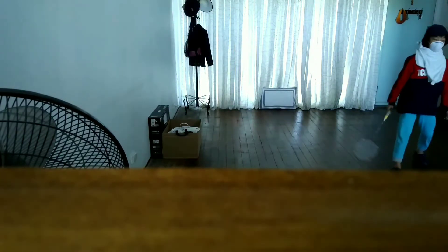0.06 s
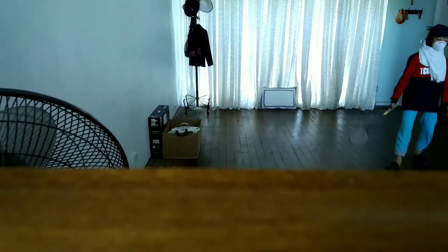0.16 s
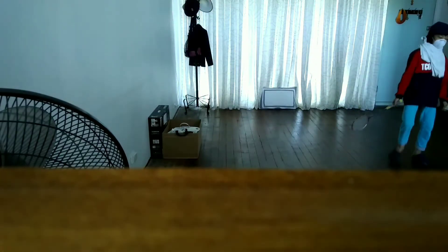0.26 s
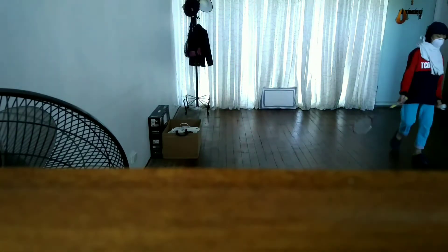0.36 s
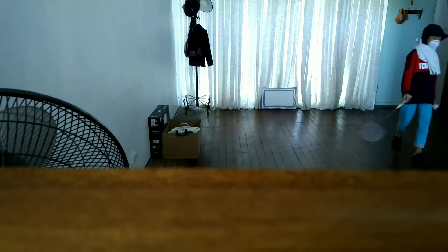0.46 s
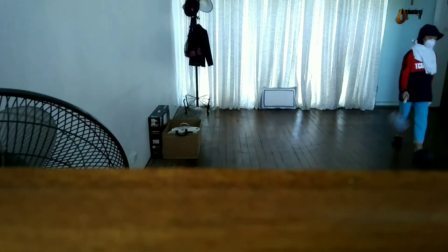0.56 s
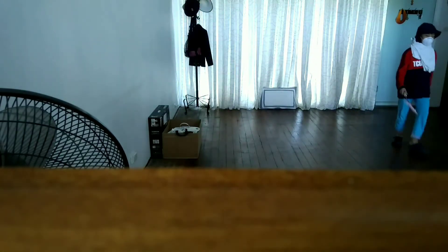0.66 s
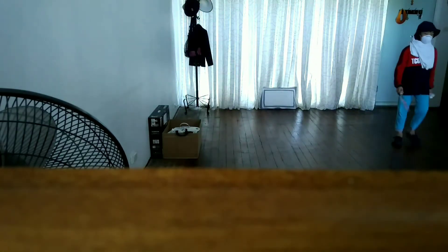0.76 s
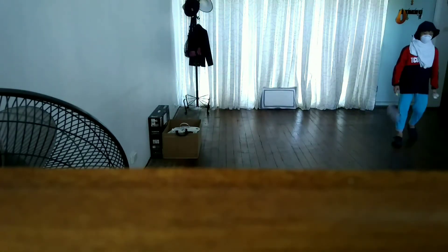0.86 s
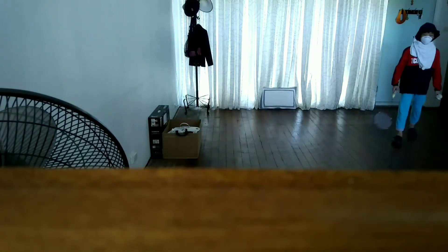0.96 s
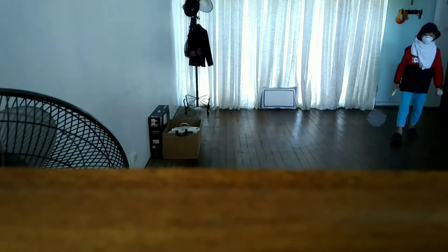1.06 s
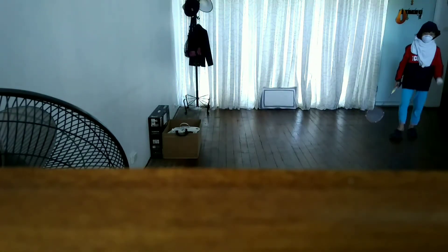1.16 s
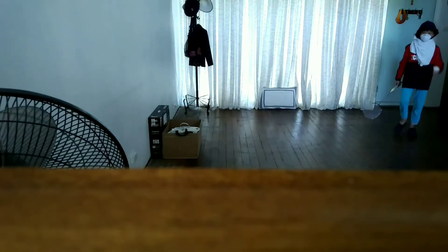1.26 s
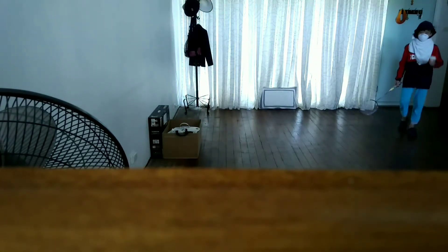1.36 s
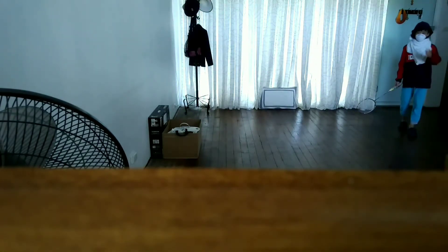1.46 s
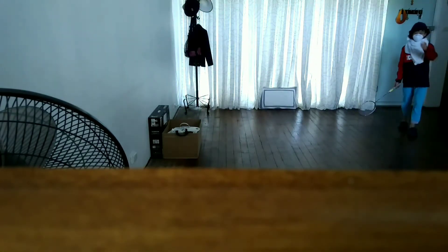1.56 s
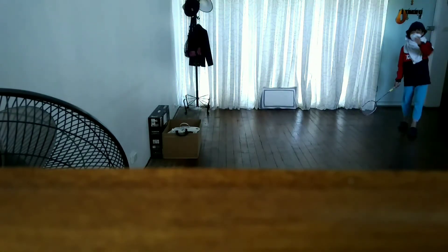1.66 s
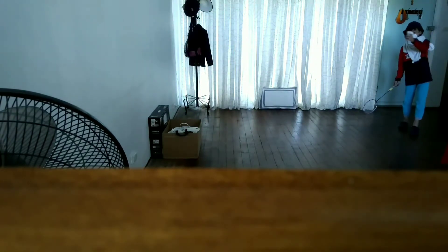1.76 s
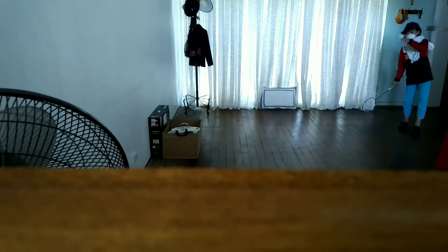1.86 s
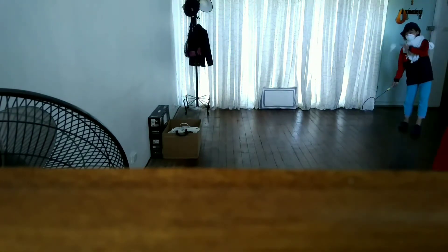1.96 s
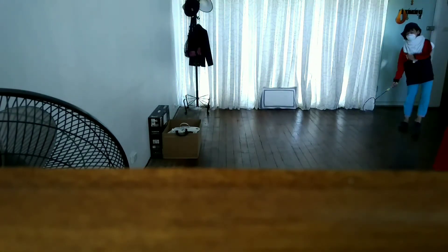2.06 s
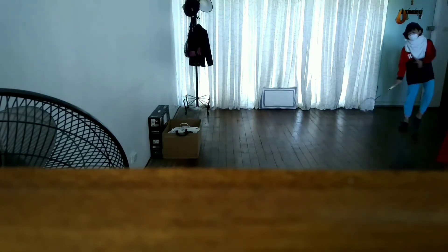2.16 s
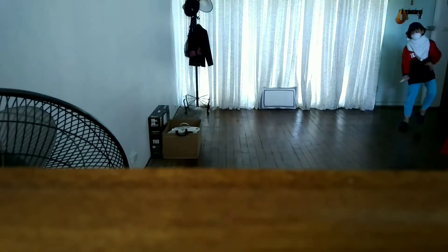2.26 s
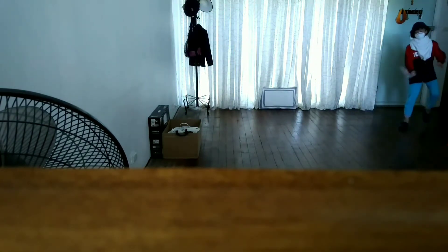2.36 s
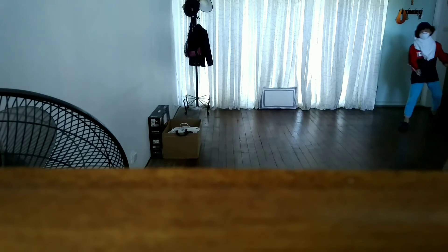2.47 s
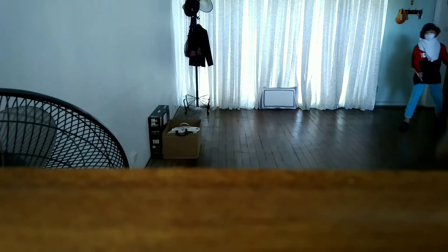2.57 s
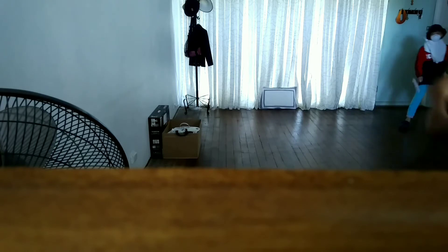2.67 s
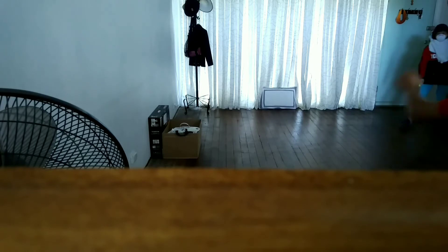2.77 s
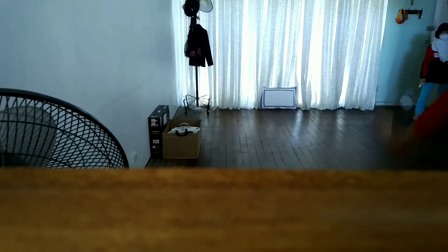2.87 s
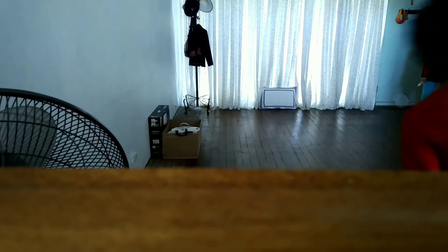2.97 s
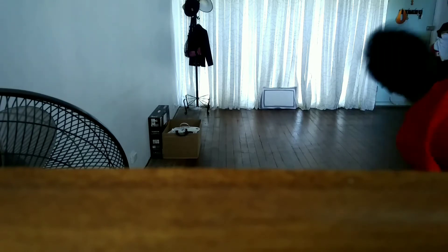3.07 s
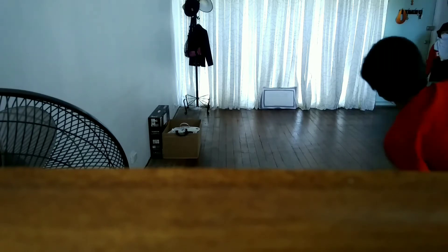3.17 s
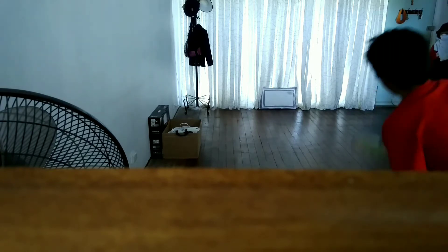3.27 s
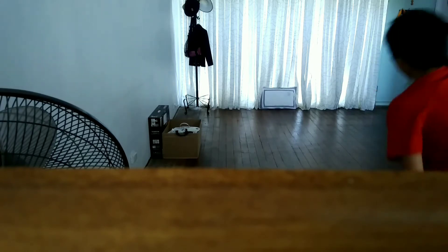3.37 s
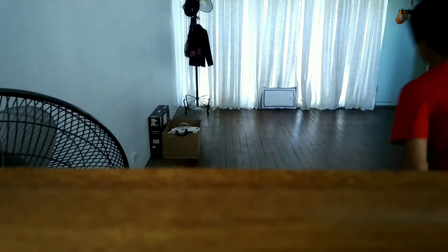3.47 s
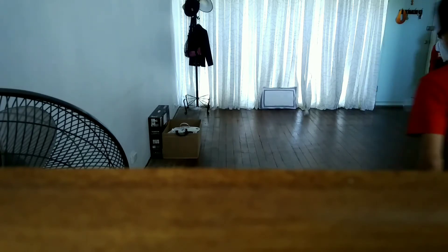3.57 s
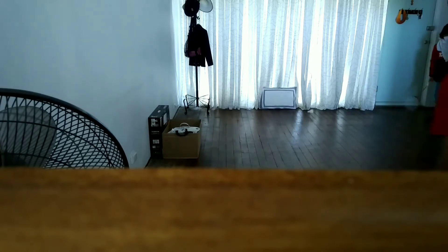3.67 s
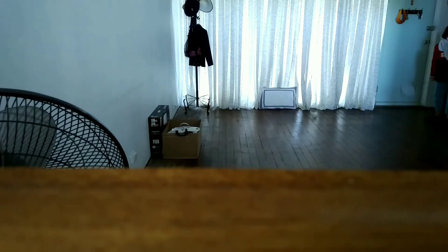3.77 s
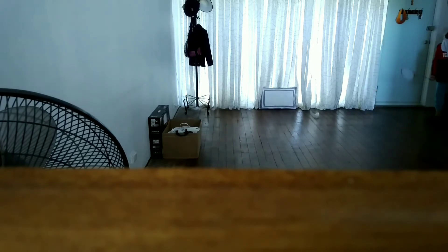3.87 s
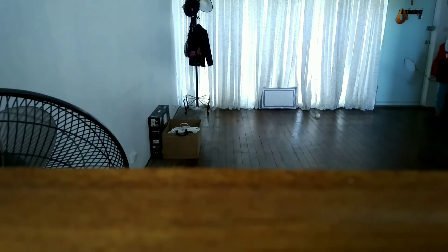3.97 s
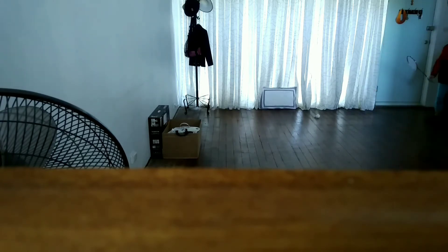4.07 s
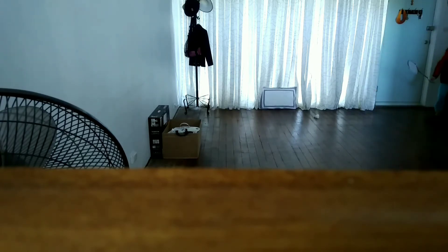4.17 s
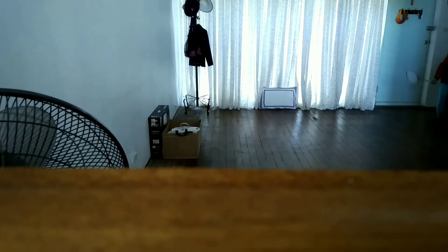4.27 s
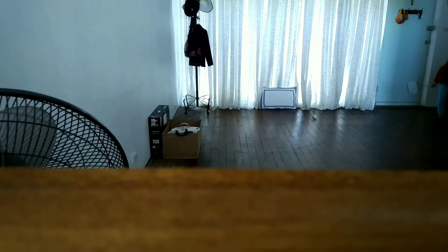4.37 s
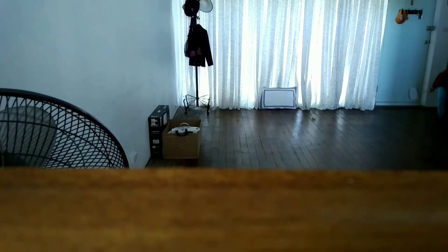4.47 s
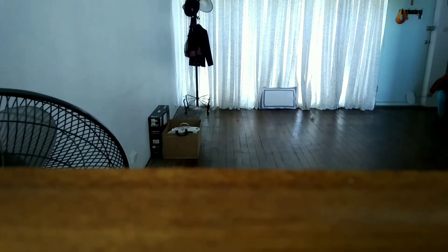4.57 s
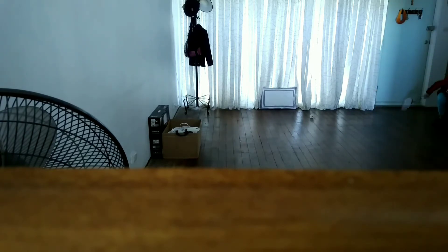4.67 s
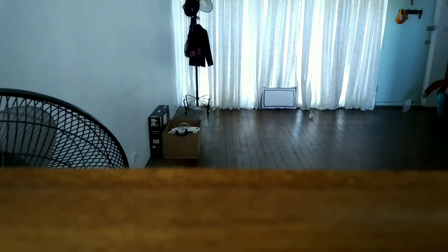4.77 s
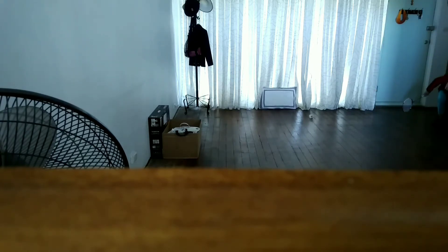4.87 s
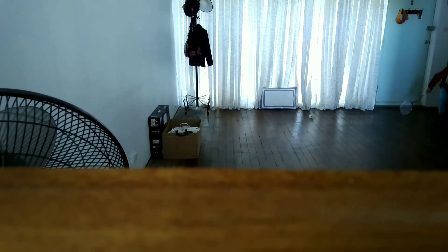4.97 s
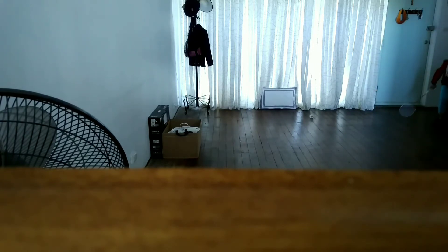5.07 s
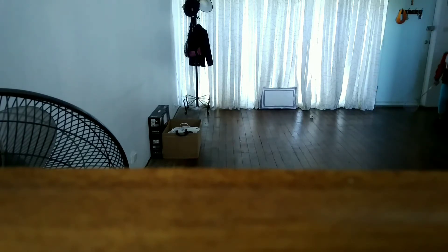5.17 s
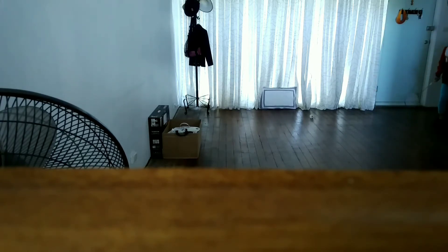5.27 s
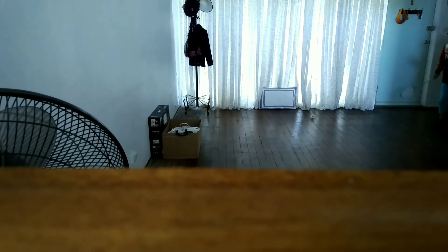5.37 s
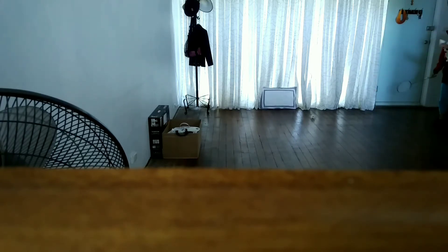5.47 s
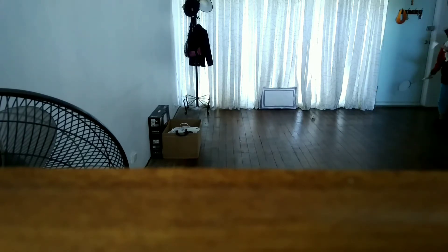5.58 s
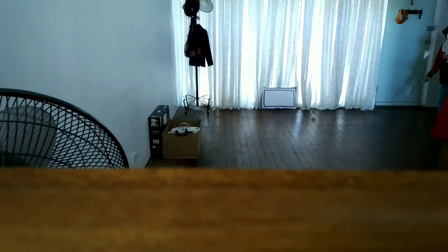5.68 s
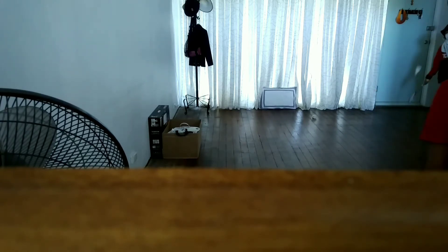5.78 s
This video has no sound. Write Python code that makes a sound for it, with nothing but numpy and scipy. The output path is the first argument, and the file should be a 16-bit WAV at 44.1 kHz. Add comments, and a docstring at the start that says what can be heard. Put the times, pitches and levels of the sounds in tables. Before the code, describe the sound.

Badminton practice in a bare, reverberant room with a wooden floor. Muffled steps, cloth rustle and sliding soles come first, with a small squeak and a faint swish. A light racket tap rings briefly, then a quick rising whoosh ends in one very loud sharp crack with a heavy footfall. Scattered knocks and faint scuffs follow. One fixed microphone hears the players at some distance, with the smash far louder than everything else.

```python
"""Badminton practice in a bare, echoing room with a wooden floor, over a faint broadband hush.
Steps thud and rumble on the boards amid rustling clothes, sliding soles, a squeak, a knock and a falling swish.
A light tap sets decaying string modes ringing; then gliding noise whistles up to one hard smash of filtered bursts.
A heavy footfall lands at once, knocks and scuffs follow, and near the end comes a faint whine.
A noise suppressor thins the faint tails and a limiter holds the loudest crack down."""
import sys
import numpy as np
from scipy import signal
from scipy.fft import rfft, irfft
from scipy.io import wavfile
from scipy.ndimage import uniform_filter1d

SR = 44100
rng = np.random.default_rng(int(sys.argv[2]) if len(sys.argv) > 2 else 0)


def dump_mix(stems):
    """Bounce the given channels to the path in sys.argv[1] as a 16-bit WAV at rate SR."""
    frames = np.atleast_2d(stems).T  # one column per channel
    limited = np.clip(frames, -1, 1)  # hard clip at full scale
    pcm = np.round(limited * 32767).astype(np.int16)
    wavfile.write(sys.argv[1], SR, pcm)


N = 257544
TIME = np.arange(N) / SR   # s

# The smash, cork on strings and then the shuttle striking home. Each row: time in seconds, level in dB.
SMASH_HITS = [(3.1109, -8.5), (3.15, -23)]
# Spectral shape of the crack. Each row: frequency in Hz, relative level in dB.
CRACK_SPECTRUM = [(40, -26), (90, -11.5), (150, 0.5), (300, 0.5), (610, 5), (820, -7), (1250, 4),
                  (1900, -5), (2700, -4.5), (4200, -5.5), (5200, -7.5), (8000, -9.5), (12000, -12.5),
                  (15500, -11.5)]
# Air whistling round the racket as it speeds up. Each row: time in seconds, pitch in Hz, level in dB.
SWING_GLIDE = [(3.054, 372, -55.5), (3.073, 476, -36.5), (3.081, 605, -27.5), (3.087, 725, -21.5),
               (3.094, 1205, -23), (3.104, 1450, -22), (3.108, 1387, -32), (3.113, 1200, -60)]

# A light tap on the shuttle, its spectral shape. Each row: frequency in Hz, relative level in dB.
TAP_SPECTRUM = [(60, -32), (150, 4), (300, 5), (480, 3), (750, -8), (1300, -3.5), (2500, -7.5), (4500, -13),
                (8000, -17.5), (15000, -21.5)]
TAP_S, TAP_DB = 2.286, -35
# Modes of the string bed. Each row: frequency in Hz, relative level in dB, 60 dB decay time in seconds.
STRING_MODES = [(1045.3, -43.5, 0.35), (1048, -34.5, 1.2), (1054, -45.5, 2.3), (1075.8, -27, 0.41),
                (1080, -33.5, 0.47), (1710, -45, 0.67), (1712, -44.5, .55), (2130, -35.5, 0.41),
                (2065, -42, 0.6), (2146, -40.5, 0.31), (2130, -34.5, .25), (2270, -45.5, 0.26),
                (2400, -50, .5), (2690, -50.5, .45), (2690, -50, 0.61), (3722, -41, 0.3),
                (3775, -44.5, 0.32), (5819, -56, 0.39)]

# Footfalls on the boards. Each row: heel time in seconds, heel thud in dB, sole slap in dB,
# floor rumble in dB, roll in dB (how much harder the ball lands than the heel).
STEPS = [(.005, -65, -63.5, -48, 0.5), (.165, -47, -71.5, -44.5, 2), (0.494, -58, -77, -45.5, -2),
         (.556, -40.5, -65, -41, 1), (.76, -51, -86, -54, -9), (1.029, -43.5, -70, -42.5, -11.5),
         (1.316, -52.5, -80, -58, 2.5), (1.474, -50, -82, -51.5, -3.5), (1.557, -56, -57.5, -54, -15),
         (2.358, -68, -85, -62.5, -1), (2.668, -60, -80, -54, -3), (2.777, -58, -78.5, -52, -1),
         (2.95, -49, -69, -46, 3.5), (3.266, -18, -32.5, -59, -11.5), (3.76, -45.5, -77.5, -45.5, -1),
         (4.33, -76.5, -94, -63, -6.5), (4.8, -48.5, -83, -57.5, -1.5), (5.661, -71.5, -82, -50.5, -4.5)]
# After the heel the ball lands, then the weight settles more softly.
BALL_S, SETTLE_S, SETTLE_DB = .035, .108, -4
# Spectral shape of the heel thud. Each row: frequency in Hz, relative level in dB.
THUD_SPECTRUM = [(30, -27), (60, -17), (100, -5.5), (150, -1), (210, 2.5), (290, -2.5), (450, -17),
                 (900, -38.5), (3000, -67.5)]
# Spectral shape of the sole slap. Each row: frequency in Hz, relative level in dB.
SLAP_SPECTRUM = [(100, -14.5), (300, 2), (600, -7.5), (1300, 0), (2500, -9.5), (5000, -24.5), (9000, -34.5),
                 (15000, -51)]
# Spectral shape of the floor's rumble. Each row: frequency in Hz, relative level in dB.
RUMBLE_SPECTRUM = [(20, -23.5), (40, -13.5), (62, 7.5), (95, 1.5), (170, -9.5), (300, -35), (1000, -50)]
RUMBLE_SWELL_S, RUMBLE_T60_S = 0.044, 0.46

# Hard knocks on wood. Each row: time in seconds, hollow body in dB, clack in dB, bright tick in dB.
KNOCKS = [(.987, -45.5, -49, -56), (3.658, -35, -28.5, -51.5), (3.893, -55, -34.5, -82),
          (4.02, -55, -44.5, -92), (4.747, -34.5, -52.5, -87.5), (5.26, -86.5, -85, -53.5)]
# Spectral shape of the hollow body. Each row: frequency in Hz, relative level in dB.
BODY_SPECTRUM = [(50, -19), (90, -6), (145, -6.5), (210, -3.5), (380, -2.5), (570, -3), (800, -16.5),
                 (1150, -12.5), (1700, -22.5), (3000, -42), (8000, -80)]
# Spectral shape of the woody clack. Each row: frequency in Hz, relative level in dB.
CLACK_SPECTRUM = [(100, -43.5), (300, 2), (700, -9.5), (1050, -1), (1700, -5.5), (2300, -16), (3200, -34),
                  (5000, -42), (15000, -45.5)]
# Spectral shape of the bright tick, also of the smash's snap. Each row: frequency in Hz, relative level in dB.
TICK_SPECTRUM = [(300, -71.5), (1900, -13), (2900, 6.5), (5000, 0.5), (8000, 0.5), (12000, 1), (16000, 5.5)]
# Small dry ticks close by. Each row: time in seconds, level in dB.
NEAR_TICKS = [(.883, -63.5), (4.324, -53.5)]
# Spectral shape of the near ticks. Each row: frequency in Hz, relative level in dB.
NEAR_TICK_SPECTRUM = [(200, -64), (420, 10), (600, -1.5), (1100, -4), (1500, -29), (3000, -23), (8000, -42)]

# Faint squeaky scuffs of the soles. Each row: start in seconds, length in seconds, pitch in Hz, level in dB.
SCUFFS = [(0.049, 0.05, 1150, -57), (1.397, 0.028, 1788, -62.5), (1.4, 0.023, 571, -56),
          (1.398, 0.013, 906, -62.5), (4.097, 0.13, 1240, -61), (4.429, 0.074, 1950, -71),
          (4.461, 0.12, 1320, -68), (4.425, 0.065, 3387, -65), (5.327, 0.058, 1412, -64),
          (5.52, .14, 2200, -75.5), (5.638, 0.12, 565.6, -62)]
# A sole squeaks as it turns. Each row: time in seconds, pitch in Hz, level in dB.
SQUEAK_GLIDE = [(.595, 1285, -52), (.612, 1255, -41.5), (.66, 1200, -66), (.72, 1170, -57.5),
                (.79, 1167, -77), (.85, 1170, -85), (.88, 1150, -96)]
# A short falling swish. Each row: time in seconds, pitch in Hz, level in dB.
SWISH_GLIDE = [(1.812, 2686, -77), (1.825, 2550, -54.5), (1.855, 2130, -52.5), (1.88, 1644, -59),
               (1.92, 1500, -91), (1.96, 1490, -84)]
# A faint high whine near the end. Each row: time in seconds, pitch in Hz, level in dB.
WHINE_GLIDE = [(5.42, 3380, -84), (5.52, 3402, -71.5), (5.65, 3340, -72.5), (5.76, 3430, -68),
               (5.84, 3330, -93)]

# Clothes rustle with each move of a limb. Each row: start in seconds, length in seconds, level in dB.
RUSTLES = [(.02, 0.15, -58.5), (.42, 0.094, -57.5), (.58, 0.036, -59.5), (.94, 0.14, -59),
           (1.39, 0.13, -67), (1.825, 0.072, -58), (2.6, 0.054, -63), (2.76, 0.04, -58.5),
           (2.94, 0.091, -55), (3.56, .03, -59), (4.1, 0.08, -58.5), (4.24, 0.082, -61), (4.42, .04, -66),
           (5.73, .04, -67)]
RUSTLE_ATTACK_S, RUSTLE_RELEASE_S = 0.02, 0.055
# Spectral shape of cloth, also of the swing's hiss. Each row: frequency in Hz, relative level in dB.
RUSTLE_SPECTRUM = [(500, -11), (1500, -4), (4000, -1.5), (7000, 2), (10000, -5), (15000, 0.5)]
# Soles slide over the boards. Each row: start in seconds, length in seconds, level at the end in dB.
SLIDES = [(0, 0.18, -52), (.44, 0.11, -66), (.6, 0.041, -51), (1.03, 0.046, -52.5), (1.51, 0.11, -57),
          (2.53, 0.11, -55), (2.74, 0.098, -57.5), (2.92, .14, -48), (3.54, 0.035, -48), (4.09, 0.059, -59),
          (4.48, 0.11, -73), (5.72, 0.042, -72)]
# A slide grows as weight comes onto the foot.
SLIDE_ATTACK_S, SLIDE_RELEASE_S, SLIDE_GROWTH_DB_PER_S = 0.015, .018, 43
# Spectral shape of sliding soles. Each row: frequency in Hz, relative level in dB.
SLIDE_SPECTRUM = [(200, -9.5), (600, 1), (850, -16), (1350, 5), (2000, 1), (3500, -5.5), (6000, -19),
                  (15000, -27.5)]

# Spectral shape of the still room. Each row: frequency in Hz, relative level in dB.
HUSH_SPECTRUM = [(15, -42), (25, -16), (66, -1), (150, -9), (274, -19), (349, -6), (495, -22),
                 (1620, -20.5), (3630, -21), (7100, -22.5), (15500, -26)]
HUSH_DB = -73
# Decay of the room before each source's tail factor. Each row: frequency in Hz, 60 dB decay time in seconds.
ROOM_T60 = [(60, .52), (150, .6), (350, .62), (700, .63), (1300, .68), (2700, .58), (5000, .52),
            (8000, .41), (11000, .34), (16000, .28)]

HISS_GATE_DB = -61
LIMIT_DB, RELEASE_DB_PER_S = -10.5, 115.5
PEAK, CUTOFF_HZ = 0.71, 15700


def smash():
    """Aerodynamic noise and impact: the racket whistles and hisses, then cracks; a bright snap arrives first."""
    s, _, swing_db = np.transpose(SWING_GLIDE)
    hiss_level = from_db(-6.5) * np.interp(TIME, s, from_db(swing_db), left=0, right=0)
    hiss = hiss_level * noise(RUSTLE_SPECTRUM)
    air = whistle(SWING_GLIDE, width_hz=480) + hiss

    hit_s, hit_db = np.transpose(SMASH_HITS)
    crack = colour(contacts(hit_s, hit_db, chatter=0.19, chatter_s=0.0056), CRACK_SPECTRUM)
    snap_burst = contacts(hit_s[:1], hit_db[:1], chatter=8, chatter_s=.011)
    snap = from_db(-7.5) * colour(snap_burst, TICK_SPECTRUM)   # heard without the room
    return room(air, direct_db=0.5) + room(crack, direct_db=-20.5, build_s=0.00077) + snap


def tap():
    """Modal vibration: the cork pops on the strings, whose close modes swell, ring on and beat."""
    pop = colour(contacts([TAP_S], [TAP_DB], chatter=0.94, chatter_s=0.004), TAP_SPECTRUM)
    age = TIME[:2 * SR]
    modes = np.zeros(len(age))
    for hz, db, t60 in STRING_MODES:
        modes += from_db(db - 60 * age / t60) * np.sin(2 * np.pi * hz * age)
    swelling = modes * (1 - np.exp(-age / 0.018))
    ring = np.interp(TIME - TAP_S, age, swelling, left=0, right=0)
    return room(pop, direct_db=-17.5, build_s=0.0013) + from_db(1.5) * room(ring, direct_db=3)


def footsteps():
    """Impact excitation: heels thud into the boards and soles roll down after them."""
    s, thud_db, slap_db, _ = footfalls()
    thuds = colour(contacts(s, thud_db, chatter=1.4, chatter_s=0.006), THUD_SPECTRUM)
    slaps = colour(contacts(s, slap_db, chatter=0.99, chatter_s=.014), SLAP_SPECTRUM)
    return room(thuds + slaps, direct_db=-3.5, tail=.8)


def footfalls():
    """Weight transfer through heel, ball and settling: time, thud, slap and rumble of all these contacts."""
    s, *levels_db, roll_db = np.transpose(STEPS)
    times = np.transpose([s, s + BALL_S, s + SETTLE_S])
    force_db = np.transpose([0 * roll_db, roll_db, 2 * roll_db + SETTLE_DB])
    return [times.ravel()] + [(db[:, None] + force_db).ravel() for db in levels_db]


def floor_rumble():
    """Forced vibration of the floor: each contact of a foot starts a low rumble that swells and dies."""
    s, _, _, rumble_db = footfalls()
    age, power = TIME[:SR], np.zeros(N)
    shape = (1 - np.exp(-age / RUMBLE_SWELL_S)) * np.exp(-np.log(1000) * age / RUMBLE_T60_S)
    shape = shape / shape.max()
    starts = np.maximum(s * SR, 0).astype(int)
    for at, db in zip(starts, rumble_db):
        power[at:at + SR] += (from_db(db) * shape[:N - at]) ** 2
    return np.sqrt(power) * noise(RUMBLE_SPECTRUM)


def knocks():
    """Superposed impact spectra: hollow body, woody clack and bright tick; near ticks hardly wake the room."""
    s, body_db, clack_db, tick_db = np.transpose(KNOCKS)
    body = colour(contacts(s, body_db, chatter=1.0, chatter_s=0.037), BODY_SPECTRUM)
    clack = colour(contacts(s, clack_db, chatter=0.61, chatter_s=0.0053), CLACK_SPECTRUM)
    tick = colour(contacts(s, tick_db, chatter=1.0, chatter_s=0.0084), TICK_SPECTRUM)
    far = room(body + clack + tick, direct_db=-17.5, build_s=0.0031, tail=0.8)

    near_bursts = contacts(*np.transpose(NEAR_TICKS), chatter=0.93, chatter_s=0.0011)
    near = room(colour(near_bursts, NEAR_TICK_SPECTRUM), direct_db=11.5)
    return far + near


def squeaks():
    """Narrow-band noise: short swells from the soles, a falling swish and a faint whine."""
    scuffs = np.zeros(N)
    for s, length, hz, db in SCUFFS:
        end = s + length
        swell = [(s - .02, hz, db - 22), (s + 0.0025, hz, db), (end, hz, db - 10.0), (end + 0.019, hz, db - 17)]
        scuffs += whistle(swell, width_hz=0.12 * hz)
    squeak = whistle(SQUEAK_GLIDE, width_hz=150)
    swish = whistle(SWISH_GLIDE, width_hz=650)
    whine = whistle(WHINE_GLIDE, width_hz=228)
    return room(scuffs + squeak + swish + whine, direct_db=-1.5, tail=0.74)


def movement():
    """Friction noise: cloth rustles and soles slide."""
    cloth_level = strokes(RUSTLES, RUSTLE_ATTACK_S, RUSTLE_RELEASE_S)
    cloth = cloth_level * patchy(noise(RUSTLE_SPECTRUM), patchy_db=2.5)
    sole_level = strokes(SLIDES, SLIDE_ATTACK_S, SLIDE_RELEASE_S, SLIDE_GROWTH_DB_PER_S)
    soles = sole_level * patchy(noise(SLIDE_SPECTRUM), patchy_db=3.5)
    return room(cloth + soles, direct_db=3.0, tail=0.68)


def room_hush():
    """Stationary background noise: the still room as steady coloured noise."""
    return from_db(HUSH_DB) * noise(HUSH_SPECTRUM)


def whistle(rows, width_hz):
    """Quadrature modulation: slow noise on two carriers makes a narrow band that follows a gliding pitch."""
    s, hz, db = np.transpose(rows)
    on, out = (TIME > s[0]) & (TIME < s[-1]), np.zeros(N)
    t = TIME[on]
    lowpass = signal.butter(2, width_hz / 2, fs=SR, output="sos")
    slow = signal.sosfilt(lowpass, rng.standard_normal((2, SR)))
    a, b = rms_one(slow[:, :len(t)])
    phase = 2 * np.pi * np.cumsum(np.interp(t, s, hz)) / SR
    out[on] = from_db(np.interp(t, s, db)) * (a * np.cos(phase) + b * np.sin(phase))
    return out


def contacts(times, levels_db, chatter, chatter_s):
    """Impulse and dying chatter per contact, with the energy of a twentieth of a second at its level."""
    out, t = np.zeros(N), TIME[:SR // 10]
    for s, db in zip(times, levels_db):
        burst = rng.standard_normal(len(t)) * np.exp(-t / chatter_s)
        burst *= chatter / np.linalg.norm(burst)
        burst[0] = 1   # the click
        burst *= from_db(db) * np.sqrt(SR / 20) / np.linalg.norm(burst)
        at = max(round(s * SR), 0)
        out[at:at + len(t)] += burst[:N - at]
    return out


def strokes(rows, attack_s, release_s, growth_db_per_s=0):
    """Power addition of rubbing strokes: each sets in, holds or grows for its length, and dies away."""
    power = np.zeros(N)
    for s, length, db in rows:
        left = s + length - TIME
        onset = np.clip((TIME - s) / attack_s, 0, 1)
        growth = from_db(db - growth_db_per_s * np.maximum(left, 0))
        release = np.exp(np.minimum(left, 0) / release_s)
        power += (onset * growth * release) ** 2
    return np.sqrt(power)


def patchy(x, patchy_db, size=512):
    """Patchy noise: random patches of the spectrum flare and fade, and the whole band flickers."""
    bins = signal.stft(x, nperseg=size)[2]
    patches = uniform_filter1d(rng.standard_normal(bins.shape), size=6, axis=0)
    patches = uniform_filter1d(patches, size=12, axis=1)
    flickers = uniform_filter1d(rng.standard_normal(bins.shape[1]), size=2)
    change_db = patchy_db * (rms_one(patches) + 0.29 * rms_one(flickers))
    return rms_one(signal.istft(bins * from_db(change_db), nperseg=size)[1][:N])


def room(x, direct_db, build_s=0.0054, tail=1.0, build_cycles=0.53):
    """Reverberation: direct sound plus dense echoes, drawn anew for each call; the lows build up later."""
    size = 2 ** 15
    t, edges = TIME[:size], np.geomspace(35, 17000, 26)
    white, echoes = rfft(rng.standard_normal(size)), 0
    hz = np.arange(len(white)) * SR / size
    for low, high in zip(edges, edges[1:]):
        t60 = tail * at_hz(ROOM_T60, np.sqrt(low * high))
        swell = 1 - np.exp(-t / (build_s + build_cycles / high))
        decay = np.exp(-np.log(1000) * t / t60)
        band = irfft(white * ((hz >= low) & (hz < high))) * swell * decay
        # a band holds energy by its width and its ring time
        echoes = echoes + rms_one(band) * np.sqrt((high - low) * t60)
    response = echoes / np.linalg.norm(echoes)
    response[0] += from_db(direct_db)
    return signal.fftconvolve(x, response / np.linalg.norm(response))[:N]


def noise(spectrum):
    """Filtered white noise with the given spectral shape."""
    return colour(rng.standard_normal(N), spectrum)


def colour(x, spectrum, size=4096):
    """Minimum-phase filtering: a causal response of unit energy with the given spectral shape."""
    hz = np.arange(size // 2 + 1) * SR / size
    cepstrum = irfft(np.log(from_db(at_hz(spectrum, hz))))
    # folding the cepstrum onto positive time makes the filter causal
    cepstrum[1:size // 2] *= 2
    cepstrum[size // 2 + 1:] = 0
    response = irfft(np.exp(rfft(cepstrum)))
    return signal.oaconvolve(x, response / np.linalg.norm(response))[:N]


def at_hz(points, hz):
    """Interpolation of a curve on a log-frequency axis."""
    f, value = np.transpose(points)
    return np.interp(np.log(np.maximum(hz, 1)), np.log(f), value)


def from_db(db):
    """Decibel law: level in dB to amplitude."""
    return np.exp(np.asarray(db) * (np.log(10) / 20))


def rms_one(x):
    """Normalisation to unit root-mean-square."""
    return x / np.sqrt(np.mean(x ** 2) + 1e-20)


def suppress_hiss(x, depth_db, size=1024):
    """Spectral gating: bands that sink under the threshold are turned down, which shortens faint tails."""
    bins = signal.stft(x, nperseg=size)[2]
    power = uniform_filter1d(np.abs(bins) ** 2 * size, size=5, axis=-2)
    power = uniform_filter1d(power, size=3, axis=-1)
    passed = np.clip(power / (np.abs(power) + from_db(HISS_GATE_DB) ** 2), 0, 1)
    return signal.istft(bins * from_db(depth_db * (passed - 1)), nperseg=size)[1][..., :N]


def scene():
    """Superposition of all sources, as one channel."""
    player = smash() + tap() + footsteps() + floor_rumble()
    return (player + knocks() + squeaks() + movement() + room_hush())[None]


def record(dry):
    """Dynamic control: hiss is suppressed, a fast limiter acts, peaks are rounded, the top is cut."""
    clean = suppress_hiss(dry, depth_db=6.0)
    power = uniform_filter1d(clean ** 2, size=180)   # over 4 ms
    level_db = 10 * np.log10(np.maximum(power, 1e-12))
    # the excess is followed at once on the way up and released at a steady rate
    fall = RELEASE_DB_PER_S * TIME
    over_db = np.maximum.accumulate(np.maximum(level_db - LIMIT_DB, 0) + fall, axis=-1) - fall
    held = PEAK * np.tanh(clean * from_db(-over_db) / PEAK)
    return signal.sosfilt(signal.ellip(12, .1, 80, CUTOFF_HZ, fs=SR, output="sos"), held)


dry = scene()
out = record(dry)
dump_mix(out)
```